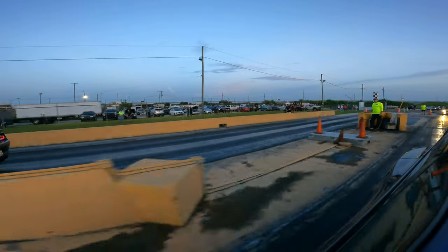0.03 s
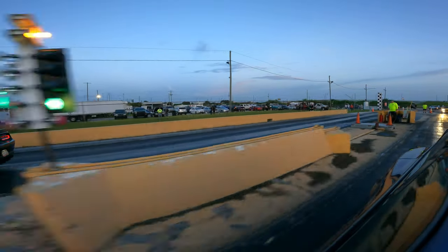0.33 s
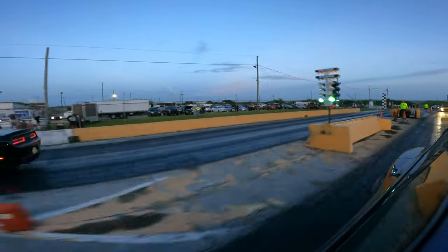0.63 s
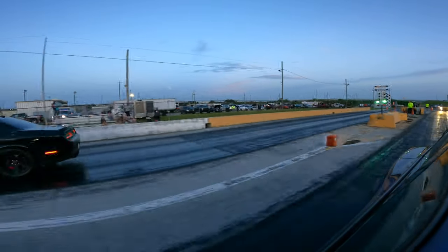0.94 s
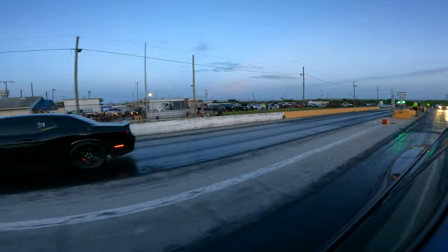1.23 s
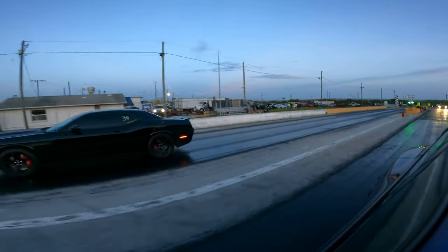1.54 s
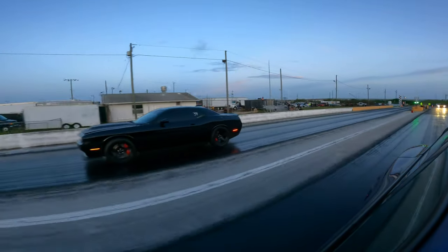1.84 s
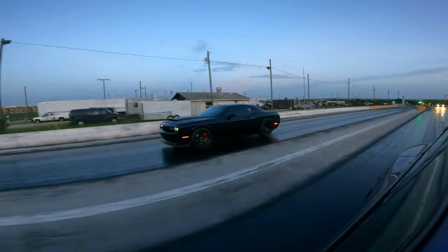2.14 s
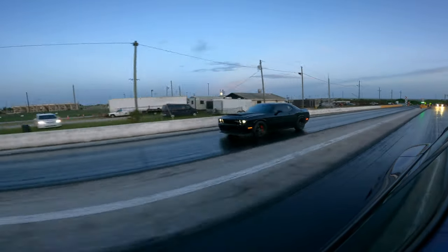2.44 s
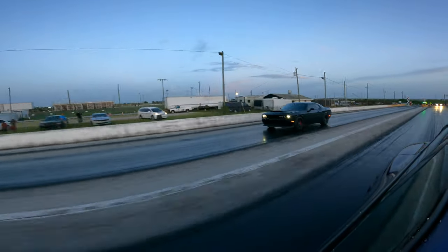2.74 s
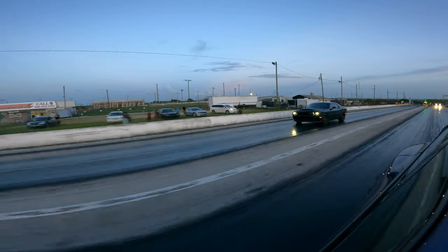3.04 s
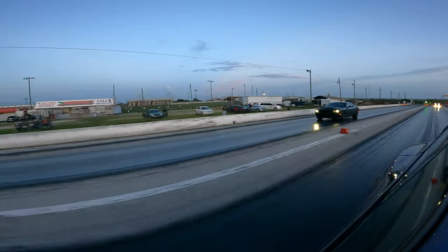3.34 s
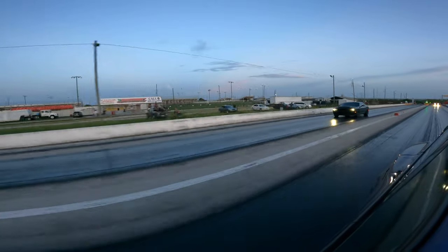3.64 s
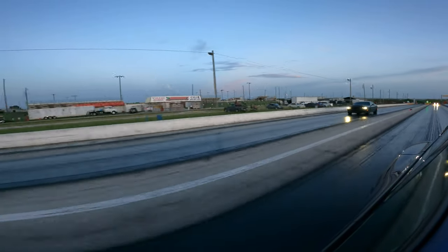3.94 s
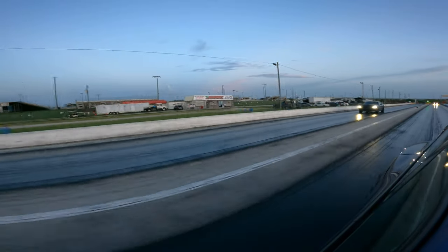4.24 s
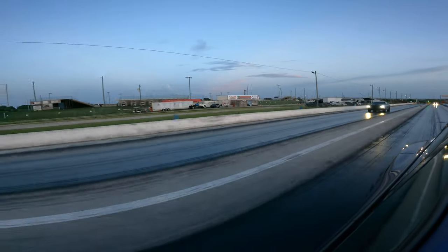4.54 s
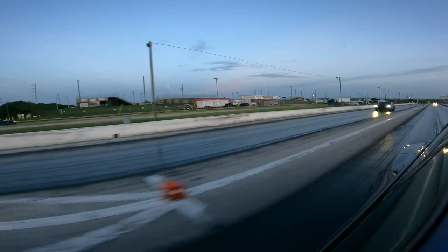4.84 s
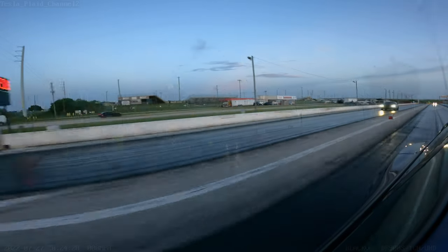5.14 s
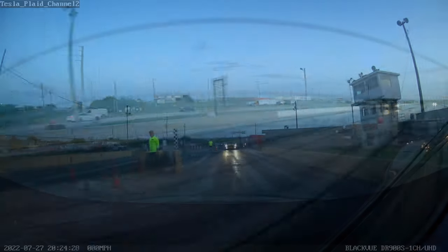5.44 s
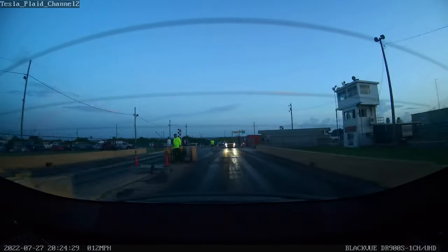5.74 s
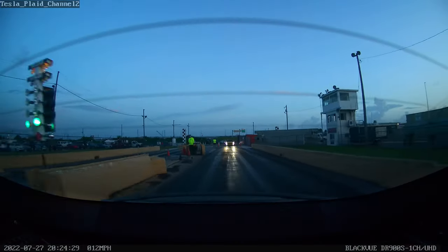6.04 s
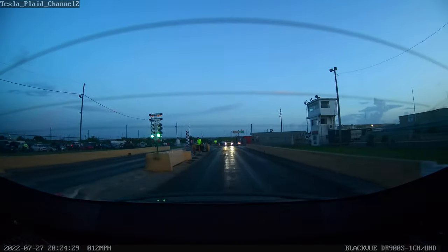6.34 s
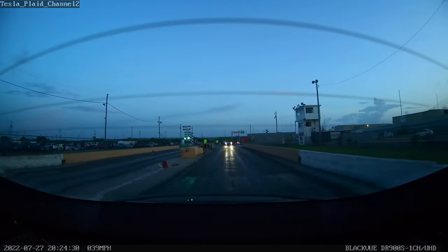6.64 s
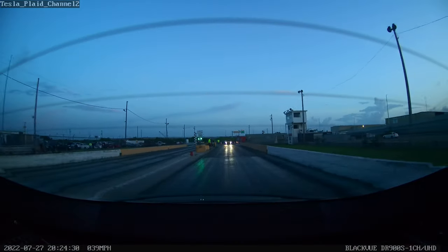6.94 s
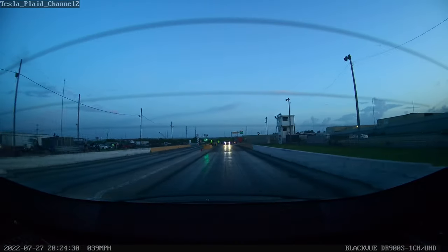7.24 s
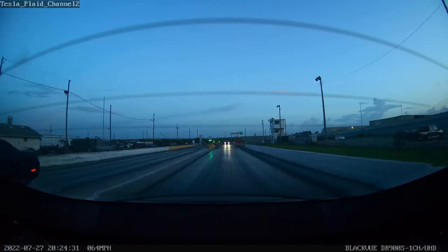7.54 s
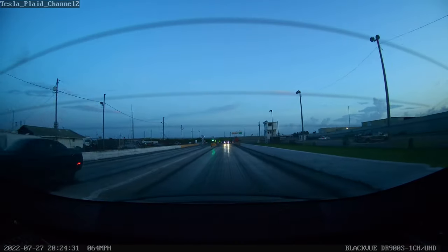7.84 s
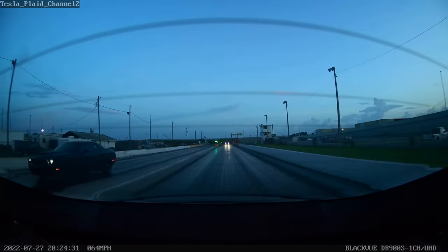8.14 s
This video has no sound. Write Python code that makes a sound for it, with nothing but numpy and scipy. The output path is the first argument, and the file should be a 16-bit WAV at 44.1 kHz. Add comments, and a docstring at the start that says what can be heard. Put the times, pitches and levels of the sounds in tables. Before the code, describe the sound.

A V8 launches beside an electric car on a dragstrip, its revs flaring over hissing tyres, dipping, climbing and dropping at an upshift. It falls behind as road roar and gusty wind grow. The sound then cross-fades to the same launch heard inside the closed cabin: the V8 booms and growls over road rumble, a rising motor hum and faint whine, with a brief tyre squeal, rattling trim and a few dry ticks.

```python
"""Electric car against a V8

One dragstrip run plays twice. Beside the electric car, the V8 spins its tyres, grips, shifts and drops
behind while tyre roar and wind grow with speed. A cross-fade replays the launch at the windscreen:
exhaust orders (multiples of the engine cycle), motor hum and inverter tones sweep through the car's
resonances, with a tyre chirp, rattling trim and dry ticks."""
import sys
import numpy as np
from scipy import signal
from scipy.fft import rfft, irfft
from scipy.io import wavfile
from scipy.ndimage import uniform_filter1d, minimum_filter1d

SR = 44100
rng = np.random.default_rng(int(sys.argv[2]) if len(sys.argv) > 2 else 0)


def to_wav(sig):
    """Store sig (one row per channel, or 1-D mono) as 16-bit WAV at the path in sys.argv[1].

    Samples outside -1..1 are clipped; the rate is SR.
    """
    pcm = np.clip(np.atleast_2d(sig), -1, 1) * 32767
    pcm = np.round(pcm).astype(np.int16)
    wavfile.write(sys.argv[1], SR, pcm.T)  # frames by channels


N = 366030
TIME = np.arange(N) / SR
BINS = np.fft.rfftfreq(N, 1 / SR)
REPLAY_TIME = TIME - 5.447  # the run's clock in the cabin view
FIRING_ORDER = 8  # eight cylinders fire in each engine cycle


def amp(db):
    """Decibels to gain."""
    return 10 ** (np.asarray(db) / 20)


def unit(x):
    """Scales to rms 1."""
    return x / np.sqrt(np.mean(x ** 2) + 1e-20)


def read(points, hz):
    """Reads a spectrum on a log axis, holding its end values."""
    f, value = np.transpose(points)
    return np.interp(np.log(hz + 1), np.log(f + 1), value)


def curves(rows):
    """An automation curve for each column after the time."""
    times, *columns = np.transpose(rows)
    return [np.interp(TIME, times, column) for column in columns]


def during(rows, fade_s):
    """A gate, open over a table's time span and fading beyond it."""
    return np.clip(1 + np.minimum(TIME - rows[0][0], rows[-1][0] - TIME) / fade_s, 0, 1)


def swells(rows):
    """A bell-shaped gain for each event."""
    return sum(amp(db) * np.exp(-.5 * ((TIME - peak_s) / width_s) ** 2) for peak_s, db, width_s in rows)


def rings(rows, order):
    """The swells in which one exhaust order rings out."""
    return swells([row[:3] for row in rows if round(row[3]) == order])


def lift(modes, hz):
    """Decibels that a moving tone gains from the resonances it passes."""
    grid = np.arange(0, 9000, 2)
    return np.interp(hz, grid, sum(db * np.exp(-((grid - f) / width) ** 2) for f, width, db in modes))


def drift(rate_hz):
    """Slow random motion of rms 1."""
    return unit(irfft(rfft(rng.standard_normal(N)) * np.exp(-(BINS / rate_hz) ** 2), N))


def phase_of(hz):
    """Running phase of a pitch curve with rounded corners."""
    return 2 * np.pi * np.cumsum(uniform_filter1d(hz, size=1500, mode="nearest")) / SR


def noise(colour, lo_hz=12, hi_hz=16000):
    """One band of a coloured noise, rms 1."""
    band = 1 / np.sqrt((1 + (lo_hz / (BINS + 1)) ** 10) * (1 + (BINS / hi_hz) ** 10))
    return unit(irfft(rfft(rng.standard_normal(N)) * amp(read(colour, BINS)) * band, N))


def tone(phase, waver, rate_hz=8):
    """A partial of rms near 1; shifting reflections add a random part that makes it waver."""
    knots = np.arange(0, TIME[-1] + 1, 1 / rate_hz)
    a, b = (np.interp(TIME, knots, v[:len(knots)]) for v in rng.standard_normal((2, 2000)))
    phase = phase + 2 * np.pi * rng.random()
    partial = (1 + waver * a) * np.cos(phase) + waver * b * np.sin(phase)
    return np.sqrt(2) * partial / np.sqrt(1 + waver ** 2)


def exhaust(cycle_hz, orders, colour, waver, rate_hz, skip=(FIRING_ORDER,)):
    """Uneven firing of the two banks sounds the orders from 2 up; its jitter smears the high ones."""
    phase, jitter_rad = phase_of(cycle_hz), .8 * drift(70)
    return sum(amp(read(orders, k) + read(colour, k * cycle_hz))
               * tone(k * phase + jitter_rad * np.interp(k, [16, 26], [0, 1]), waver, rate_hz)
               for k in range(2, round(orders[-1][0]) + 1) if k not in skip)


# The V8's rev curve: time_s, cycle_hz
REV_CURVE = [(0, 37.9), (.09, 39.1), (.32, 45.2), (.51, 46.5), (.59, 46.05), (.7, 40.95), (.84, 35.2),
             (1.05, 40.2), (1.25, 41.3), (1.66, 47), (1.8, 48), (1.91, 48.6), (2.01, 43.3), (2.06, 38.7),
             (2.16, 33.1), (2.47, 35.5), (2.85, 37.3)]

def revs(t):
    """Engine cycles a second: the V8 flares in wheelspin, grips, pulls, shifts up and pulls again."""
    return np.interp(t, *np.transpose(REV_CURVE))


# Fader ride of the firing tone: time_s, level_db
SIDE_FIRING = [(0, -20.5), (.12, -13.5), (.33, -20), (.48, -16), (.72, -14), (.83, -17), (1.18, -12),
               (1.3, -21), (1.9, -34), (2.1, -21), (2.4, -46)]
# Balance of the rough orders around it: order, gain_db
ROUGH_ORDERS = [(3, -10.5), (4, -25.5), (5, -12), (6, -8), (7, -10.5), (9, -14), (10, -13), (11, -14.5),
                (12, -18), (13, -19), (14, -13), (15, -26.5), (16, -15), (17, -16.5), (18, -15.5),
                (20, -28), (24, -35.5), (32, -37)]
# Exhaust rumble around the upshift: peak_s, level_db, width_s
SHIFT_RUMBLE = [(2.2, -19, 0.84)]
# Orders ringing out as the cars shift against each other: peak_s, level_db, width_s, order
SIDE_OVERTONES = [(.07, -26, .06, 12), (.5, -29, .1, 13), (.58, -28, .08, 14), (.76, -28, .05, 16),
                  (.87, -23.5, .07, 18), (1.25, -24.5, .17, 16)]

def v8_side():
    """The V8 alongside: a strong firing tone over rough orders, with overtones that come and go."""
    firing_db, = curves(SIDE_FIRING)
    cycle_hz = revs(TIME) * (1 + 0.0029 * drift(25))
    phase = phase_of(cycle_hz)
    # Tone of the pipe: frequency_hz, gain_db
    pipe = [(120, -3.5), (170, -7.5), (225, -3.5), (300, 1), (480, -2), (560, -4.5), (650, -1),
            (720, -4.5), (800, -17.5)]
    rough = amp(0.14 * firing_db - 13) * exhaust(cycle_hz, ROUGH_ORDERS, pipe, waver=1, rate_hz=28)
    firing = amp(firing_db) * tone(FIRING_ORDER * phase, waver=0.049, rate_hz=47)
    rumble = swells(SHIFT_RUMBLE) * noise(OUTSIDE_EQ, 160, 320)
    overtones = sum(rings(SIDE_OVERTONES, k) * tone(k * phase, waver=0.3, rate_hz=30)
                    for k in {round(row[3]) for row in SIDE_OVERTONES})
    return during(SIDE_FIRING, 0.45) * (firing + rough + overtones) + rumble


START_HZ, CLIMB_HZ_PER_S, KNEE_HZ = 128.3, 120.5, 237.1

def drive_hz(t):
    """Motor pitch follows road speed: full torque up to the knee, then constant power."""
    straight = np.maximum(START_HZ + CLIMB_HZ_PER_S * t, 20)
    return np.where(straight < KNEE_HZ, straight, np.sqrt(KNEE_HZ * abs(2 * straight - KNEE_HZ)))


def doublings(t):
    """Road speed in doublings above the knee."""
    return np.log2(drive_hz(t) / KNEE_HZ)


# Tone of the noise beside the car: frequency_hz, gain_db
OUTSIDE_EQ = [(20, -9.5), (45, -1), (75, 0), (105, 2.5), (170, 1), (300, 2.5), (420, -5), (700, -8),
              (1200, -14.5), (2000, -25.5), (4000, -38), (6500, -46.5), (9000, -56.5), (12000, -73),
              (15000, -82)]
# Road and wind bands: low_hz, high_hz, knee_db, db_per_doubling, floor_db, ceiling_db, gust_db
ROAD_BANDS = [(12, 184, -25, 8, -18.5, -17, -1), (170, 334, -23.5, 8, -22, -19, 0),
              (359, 640, -29.5, 22, -21, -20, 0), (617, 985, -30.5, 14.5, -29, -22, 1),
              (978, 1300, -33, 11, -35, -23, 0), (1320, 2120, -37, 11.5, -37, -25, .5)]

def road_side(boom_hz=78.1, boom_db=-27.5):
    """Rumble, tyre roar and gusty wind grow with speed; the body booms once the car is fast."""
    speed, gust = doublings(TIME), drift(33)
    roar = np.zeros(N)
    for lo_hz, hi_hz, knee_db, db_per_doubling, floor_db, ceiling_db, gust_db in ROAD_BANDS:
        level_db = np.clip(knee_db + db_per_doubling * speed, floor_db, ceiling_db)
        roar += amp(level_db + gust_db * gust) * noise(OUTSIDE_EQ, lo_hz, hi_hz)
    boom = amp(boom_db) * tone(2 * np.pi * boom_hz * TIME, waver=1.7, rate_hz=9.7)
    return roar + np.interp(TIME, [2.95, 3.12], [0, 1]) * boom


# Fader rides of three treble bands: time_s, low_db, middle_db, top_db
HISS_RIDES = [(0, -47, -51, -52), (0.2, -39, -48, -54), (0.45, -36, -48.5, -53.5), (0.7, -37.5, -49, -55),
              (1.05, -42, -51, -57), (1.5, -37, -48.5, -55.5), (2.0, -36.0, -45, -56.5),
              (2.3, -36.5, -48.5, -59.5), (2.8, -35, -47.0, -58), (3.3, -32, -44.5, -56),
              (4.1, -31.5, -43.5, -55), (4.8, -27.5, -39.5, -52.5), (5.2, -28.5, -40.5, -53.0)]
# Edges of those bands: low_hz, high_hz
HISS_EDGES = [(2100, 4370), (4300, 6900), (7200, 16000)]
# Short rasps of rubber: peak_s, level_db, width_s, low_cut_hz
RUBBER_RASPS = [(.02, -26.5, 0.048, 880), (.365, -32, 0.016, 1510)]

def hiss_side(gust_db=1.04):
    """Rubber hisses, rasps and sizzles until the tyres bite; then spray and wind take over."""
    gust = amp(gust_db * drift(33))
    hiss = sum(amp(db) * noise(OUTSIDE_EQ, *band) for db, band in zip(curves(HISS_RIDES), HISS_EDGES))
    rasp = sum(swells([swell]) * noise(OUTSIDE_EQ, lo_hz) for *swell, lo_hz in RUBBER_RASPS)
    sizzle = amp(-65) * noise([(8000, -8), (12500, -8), (14500, -20)], lo_hz=8300)
    return gust * hiss + rasp + np.interp(TIME, [.17, .27], [1, 0]) * sizzle


# Fader rides of the V8 in the cabin: time_s, blare_db, firing_db, growl_db
CABIN_RIDES = [(5.5, -27, -36, -19.5), (5.8, -24.5, -21.5, -14.5), (6.05, -25.5, -26, -17.5),
               (6.3, -20, -30, -21), (6.55, -20, -22.5, -26.5), (7.1, -25.5, -21, -24),
               (7.33, -23, -23, -25), (7.39, -25.5, -25.5, -21), (7.46, -29, -19, -28),
               (7.51, -29, -25, -28), (7.57, -24, -23, -25), (7.65, -22.5, -25.5, -20.5),
               (7.85, -24.5, -26.5, -20.5), (8.3, -28, -25, -19.5)]
# Strong orders that ride the blare fader: order, gain_db
LEAD_ORDERS = [(3, -6), (24, -17)]
# Air resonances that lift them and the firing tone: centre_hz, half_width_hz, lift_db
AIR_MODES = [(111.8, 5, 12), (139.7, 13, 11.5), (278.6, 3.6, 12), (298.7, 5.6, 11), (324.5, 12, 11),
             (361, 8.2, 4.5), (980, 200, 10)]
# Balance of the low growl: order, gain_db
GROWL_BALANCE = [(2, -22), (4, -9.5), (5, -4.5), (6, -10), (7, 0), (9, -4.5), (10, -3.5), (11, -6.5),
                 (12, -8)]
# Balance of the bright blare: order, gain_db
BLARE_BALANCE = [(13, -8.5), (14, -4.5), (15, -8.5), (16, -5), (17, -6), (18, -8), (20, -13.5), (22, -19.5),
                 (23, -9), (25, -17.5), (26, -26), (27, -11.5), (28, -15), (31, -39), (40, -41), (41, -34),
                 (42, -16), (43, -41), (48, -30), (56, -48)]
# The cabin's colour on growl and blare: frequency_hz, gain_db
CABIN_EQ = [(160, 1), (215, -4), (390, -7.5), (440, -4.5), (500, -3), (555, 1.5), (590, 1.5), (655, -0.5),
            (705, 4), (745, -3.5), (800, -0.5), (930, -5.5), (1100, 5.5), (1400, -9), (1650, -14.5),
            (1900, -5)]

def v8_cabin():
    """The V8 from inside: its orders boom, growl and blare as they sweep the cabin's resonances."""
    blare_db, firing_db, growl_db = curves(CABIN_RIDES)
    cycle_hz = revs(REPLAY_TIME) * (1 + 0.002 * drift(24.2))
    phase = phase_of(cycle_hz)
    leads = {round(k): blare_db + db for k, db in LEAD_ORDERS} | {FIRING_ORDER: firing_db}
    boom = np.zeros(N)
    for k, db in leads.items():
        partial = tone(k * phase, waver=0.086 * (k / FIRING_ORDER) ** 2.6, rate_hz=2.2 * k)
        boom += amp(db + lift(AIR_MODES, k * cycle_hz)) * partial
    growl = exhaust(cycle_hz, GROWL_BALANCE, CABIN_EQ, waver=0.98, rate_hz=10, skip=leads)
    blare = exhaust(cycle_hz, BLARE_BALANCE, CABIN_EQ, waver=1, rate_hz=10, skip=leads)
    return boom + amp(growl_db) * growl + amp(blare_db) * blare + howl(phase) + burble(cycle_hz)


# Panel resonances under the motor's hum: centre_hz, half_width_hz, lift_db
PANEL_MODES = [(147, 8.3, 9), (172, 7.2, 18), (190, 10.5, 14), (215, 9.1, 8), (284.7, 27.6, 15),
               (320, 7.6, 2), (345.3, 7.8, 14.5), (367.2, 15.7, 12)]

def motor():
    """The electric drive's hum swells at each panel resonance; gear whine comes out with speed."""
    hz, speed = drive_hz(REPLAY_TIME), doublings(REPLAY_TIME)
    phase = phase_of(hz)
    hum = amp(lift(PANEL_MODES, hz)) * tone(phase, waver=0.22)
    octave = amp(-4 + 0.5 * speed) * tone(2 * phase, waver=0.95, rate_hz=13)
    whine = sum(amp(db) * tone(ratio * phase, waver=2.9, rate_hz=45)
                for ratio, db in [(3, 6.5), (5, 3.5), (5.45, -15.5), (6, -6.5), (7.55, -8)])
    whine_db = np.minimum(-63 + 34.5 * speed, -40.5)
    return amp(-28) * (hum + octave) + amp(whine_db) * whine


# Peaks and dips of the inverter's housing: centre_hz, half_width_hz, lift_db
INVERTER_MODES = [(5480, 30, 4), (5562, 22, 16), (5598, 12, 7), (5768, 16, 6), (5798, 21, 23),
                  (5855, 18, 9), (5888, 16, 12), (5978, 22, 8), (6200, 40, -12), (6285, 25, 11),
                  (6620, 70, 8), (6865, 130, 13), (7700, 220, -10)]

def inverter(carrier_hz=5000, flutter_hz=26, flutter_db=3.5):
    """Two fluttering sidebands of the switching tone climb with the motor and ring the housing."""
    step_hz = 3.125 * drive_hz(REPLAY_TIME)
    shake_hz = .004 * step_hz * drift(flutter_hz)
    first_hz, third_hz = carrier_hz + step_hz, carrier_hz + 3 * step_hz
    first_db = lift(INVERTER_MODES, first_hz) + .5 * flutter_db * drift(flutter_hz)
    first = amp(first_db) * tone(phase_of(first_hz + shake_hz), waver=.3, rate_hz=70)
    third_db = lift(INVERTER_MODES, third_hz) + flutter_db * drift(flutter_hz) - 4.5
    third = amp(third_db) * tone(phase_of(third_hz + 3 * shake_hz), waver=.5, rate_hz=50)
    third_gate = np.interp(third_hz, [6250, 6400, 7670, 7800], [0, 1, 1, 0])
    return amp(-57.5) * (first + third_gate * third)


# Tone of the road from inside: frequency_hz, gain_db
INSIDE_EQ = [(20, -10.5), (45, -0.5), (75, -8.5), (110, 0), (180, 0.5), (260, -2.5), (420, -6.5),
             (600, -10), (850, -14), (1200, -11.5), (1500, -23.5), (2000, -21), (3100, -32.5), (3700, -42),
             (4600, -43), (5500, -36.5), (6800, -52.5), (7500, -60.5), (8000, -91.5)]
# Rumbles as the tyres bite and as the V8 is passed: peak_s, level_db, width_s, low_hz, high_hz
LOW_SURGES = [(6.27, -16.5, 0.11, 30, 133), (7.92, -14.5, 0.14, 135, 203), (8.234, -12.5, 0.096, 137, 204)]

def road_cabin():
    """Road noise in the closed cabin: a surging low end, steady roar and hiss that grows with speed."""
    speed = doublings(REPLAY_TIME)
    rumble = amp(-20 + 0.5 * speed) * noise(INSIDE_EQ, hi_hz=266)
    surges = sum(swells([swell]) * noise(INSIDE_EQ, lo_hz, hi_hz) for *swell, lo_hz, hi_hz in LOW_SURGES)
    roar = amp(-21.5) * noise(INSIDE_EQ, 260, 1400)
    hiss = amp(-36.5 + 5 * speed) * noise(INSIDE_EQ, lo_hz=1480)
    return rumble + surges + roar + hiss


# Throaty, uneven overtones in the cabin: peak_s, level_db, width_s, order
CABIN_OVERTONES = [(5.8, -27, 0.14, 16), (5.84, -17.5, .085, 10), (6.0, -13, .04, 12),
                   (6.46, -20, .035, 18), (6.497, -19, .04, 12), (6.582, -28, 0.036, 24),
                   (6.657, -20.5, .05, 17), (6.71, -16, .045, 14), (6.786, -20, 0.045, 10),
                   (6.88, -17.5, .06, 12), (6.996, -17.5, 0.057, 13), (7.08, -17, .06, 12),
                   (7.423, -18, .035, 11), (7.55, -18, .025, 16), (7.75, -27, 0.13, 16),
                   (7.95, -26, .07, 22), (8.22, -30, .07, 22)]
# Fader ride of the howl at the top of first gear: time_s, level_db
HOWL_RIDE = [(6.95, -38), (7.07, -18.5), (7.3, -20.5), (7.38, -24), (7.46, -46)]
# Balance of the howl: order, gain_db
HOWL_BALANCE = [(9, -0.5), (10, -1), (11, -6), (12, -6), (13, -5), (42, -22)]

def howl(phase):
    """Exhaust orders ring out singly, and howl together beating once an engine cycle."""
    ride = amp(curves(HOWL_RIDE)[0]) * during(HOWL_RIDE, .05)
    gains = {round(k): amp(db) * ride for k, db in HOWL_BALANCE}
    orders = set(gains) | {round(row[3]) for row in CABIN_OVERTONES}
    return sum(np.hypot(gains.get(k, 0), rings(CABIN_OVERTONES, k))
               * tone(k * phase, waver=0.17, rate_hz=30) for k in orders)


# The tyres' squeal at the launch: time_s, pitch_hz, level_db
CHIRP_CURVE = [(5.88, 1085, -54), (5.97, 1069, -22.5), (6.1, 1066, -25), (6.2, 1060, -20.5),
               (6.28, 1063, -46)]

def tyre_chirp():
    """Tyres at the edge of grip sing one wavering note."""
    pitch_hz, level_db = curves(CHIRP_CURVE)
    return amp(level_db) * during(CHIRP_CURVE, .04) * tone(phase_of(pitch_hz), waver=0.55, rate_hz=50)


# Burbles at the grip and at the upshift: peak_s, gain_db, width_s
BURBLES = [(6.13, -22.5, 0.11), (7.47, -25, 0.073)]
# Balance of their orders: order, gain_db
BURBLE_BALANCE = [(5, -2.5), (8, 0.5), (11, -1), (16, -2.5), (30, -7)]
# Their dark tone: frequency_hz, gain_db
BURBLE_EQ = [(180, -8.5), (300, 3), (410, -9), (500, 0.5), (570, 3), (660, -7.5), (850, -5.5), (1200, -4.5),
             (1500, -20.5), (3000, -59), (8000, -105)]

def burble(cycle_hz, stumble_share=.045):
    """As the revs collapse the firing stumbles, and the exhaust burbles in a rush of noise."""
    stumbling_hz = cycle_hz * (1 + stumble_share * drift(60))
    firing = exhaust(stumbling_hz, BURBLE_BALANCE, BURBLE_EQ, waver=0.58, rate_hz=35)
    return swells(BURBLES) * (firing + amp(3) * noise(BURBLE_EQ))


# Bursts of rattling trim: peak_s, level_db, width_s
TRIM_BURSTS = [(6.19, -27.5, 0.013), (6.25, -34, 0.014), (6.34, -55, .006)]
# Tone of the trim: frequency_hz, gain_db
TRIM_EQ = [(600, -25), (1100, -11), (1700, 6), (3000, 4), (3800, -18), (5500, -14), (7000, -30),
           (8000, -60)]

def rattles():
    """Short buzzes of loose trim as the car leaps forward."""
    return swells(TRIM_BURSTS) * noise(TRIM_EQ) * amp(3.1 * drift(250))


# Sharp ticks: start_s, peak_db, ring_gain_db
TICK_HITS = [(6.2753, -3, -27), (7.2085, -4, -51), (8.2087, -6, -53)]
# Tone of a tick: frequency_hz, gain_db
TICK_EQ = [(300, -20), (1500, 6.5), (3000, 3.5), (4300, 1), (5600, 1), (6800, -4), (7700, -15), (8400, -68)]

def ticks(ring_hz=4250, decay_s=0.0025):
    """Dry single ticks; the first rings briefly."""
    spectrum = amp(read(TICK_EQ, np.fft.rfftfreq(512, 1 / SR)))
    click = np.fft.fftshift(irfft(spectrum))
    hits, tails = np.zeros(N), np.zeros(N)
    for start_s, peak_db, ring_gain_db in TICK_HITS:
        hits[round(start_s * SR)] = amp(peak_db) / click.max()
        tails += amp(ring_gain_db) * (TIME > start_s) * np.exp(-abs(TIME - start_s) / decay_s)
    ring = np.sin(2 * np.pi * ring_hz * TIME) + 2.6 * noise(TICK_EQ, lo_hz=1500)
    return signal.oaconvolve(hits + tails * ring, click, "same")


def scene():
    """The side view cross-fades into the cabin view; the same sound in both ears."""
    fade_out = np.interp(TIME, [5.32, 5.47, 5.63], [1, .52, 0])
    fade_in = np.interp(TIME, [5.25, 5.55], [0, 1])
    side = v8_side() + road_side() + hiss_side()
    cabin = v8_cabin() + motor() + inverter() + road_cabin() + tyre_chirp() + rattles() + ticks()
    mix = fade_out * side + fade_in * cabin
    return np.array([mix, mix])


def record(dry, ceiling=.97, cutoff_hz=15800):
    """A smooth peak limiter, then a steep high cut."""
    gain = ceiling / np.maximum(abs(dry).max(0), ceiling)
    held = minimum_filter1d(gain, size=401)
    smooth = uniform_filter1d(uniform_filter1d(held, size=201), size=201)
    high_cut = signal.firwin(511, cutoff_hz, window=("kaiser", 9), fs=SR)
    return signal.oaconvolve(dry * smooth, high_cut[None], "same")


dry = scene()
out = record(dry)
to_wav(out)
```